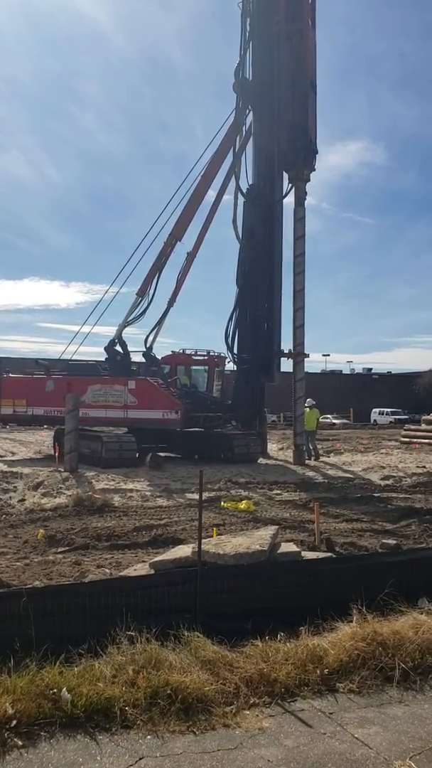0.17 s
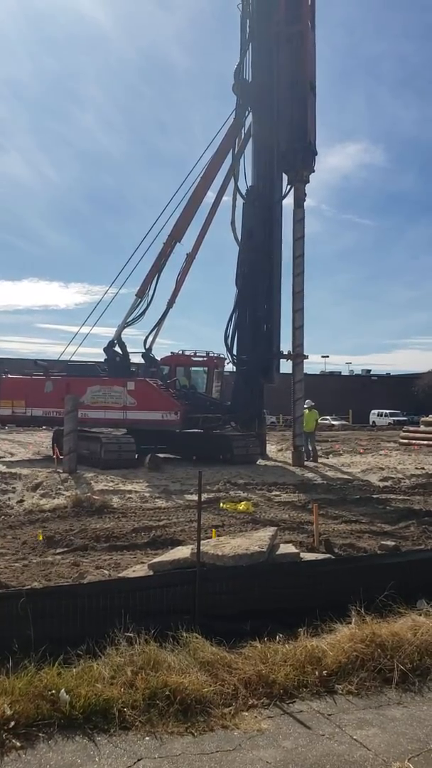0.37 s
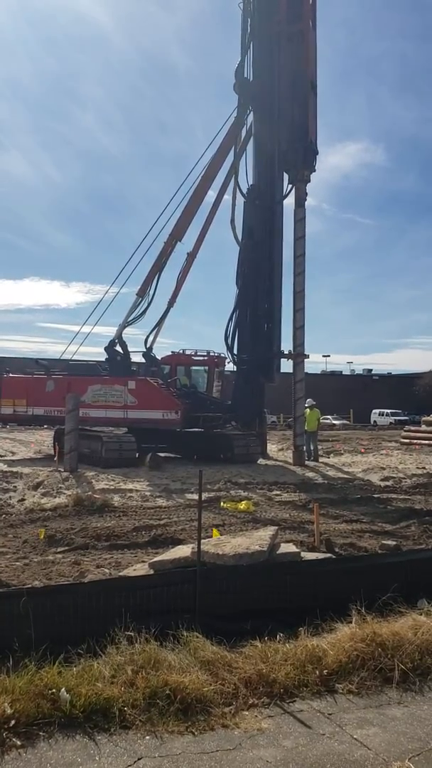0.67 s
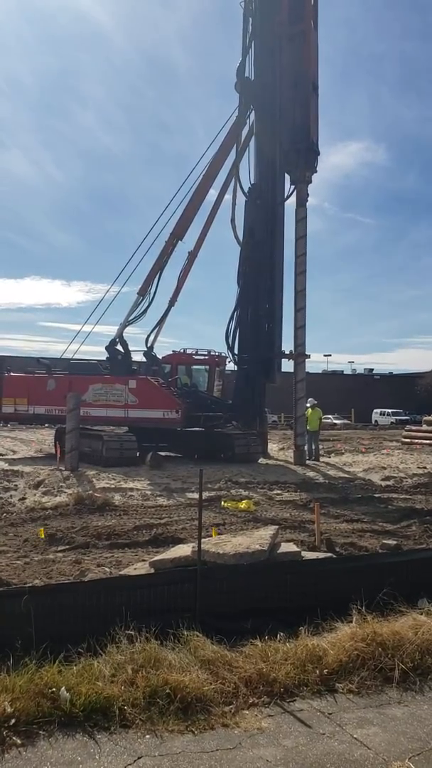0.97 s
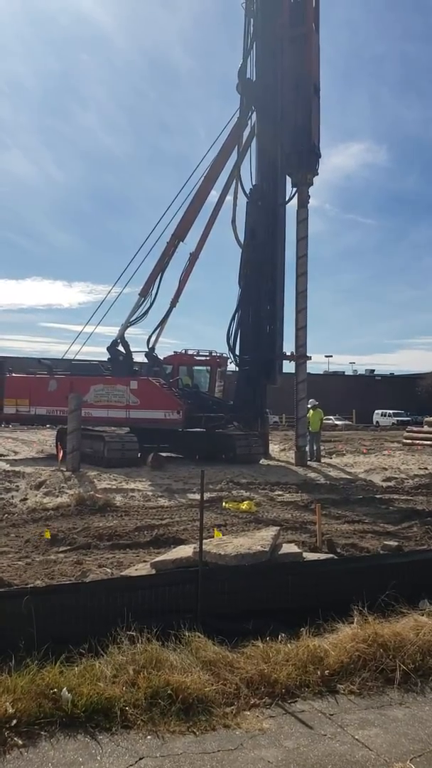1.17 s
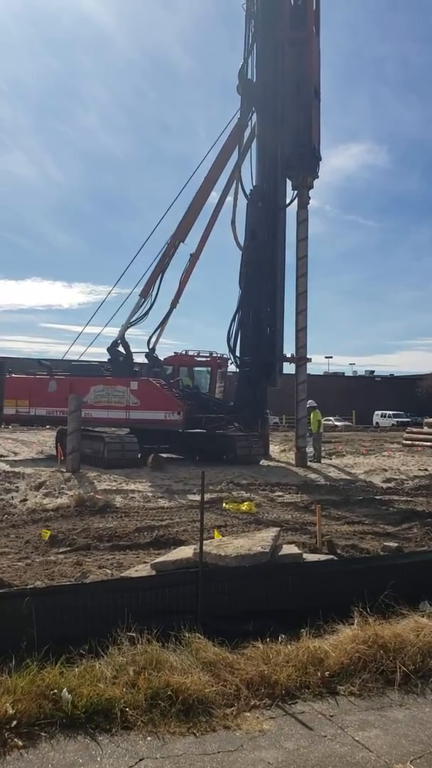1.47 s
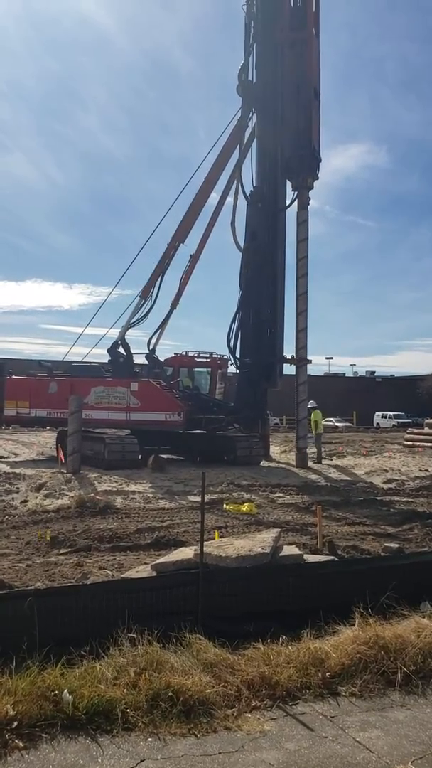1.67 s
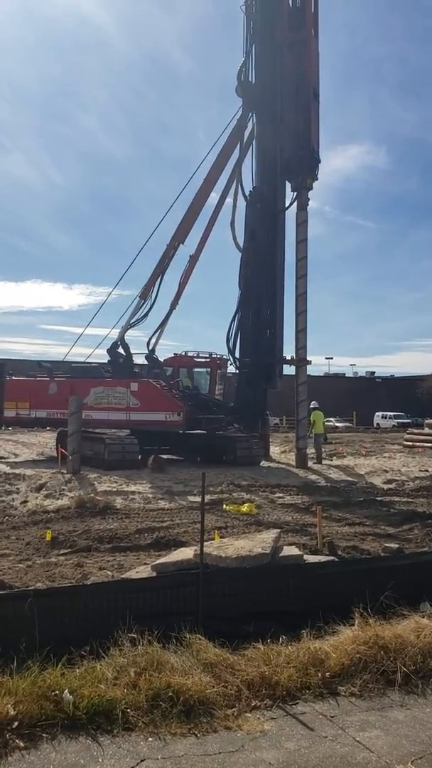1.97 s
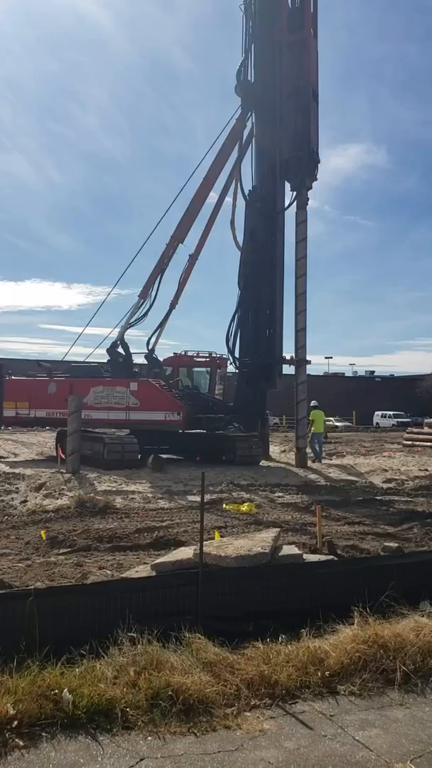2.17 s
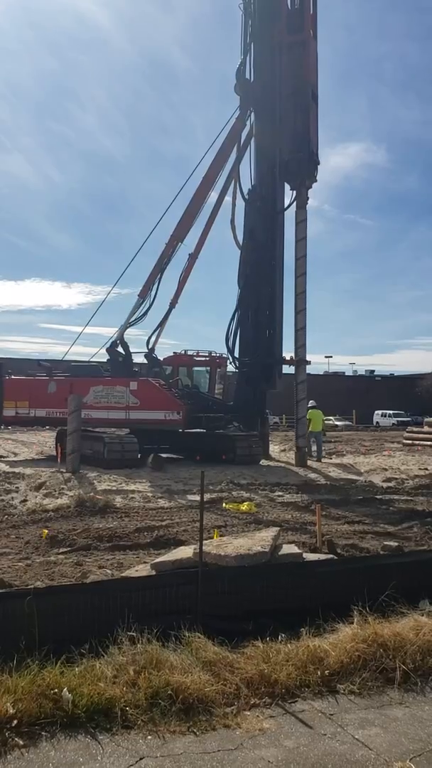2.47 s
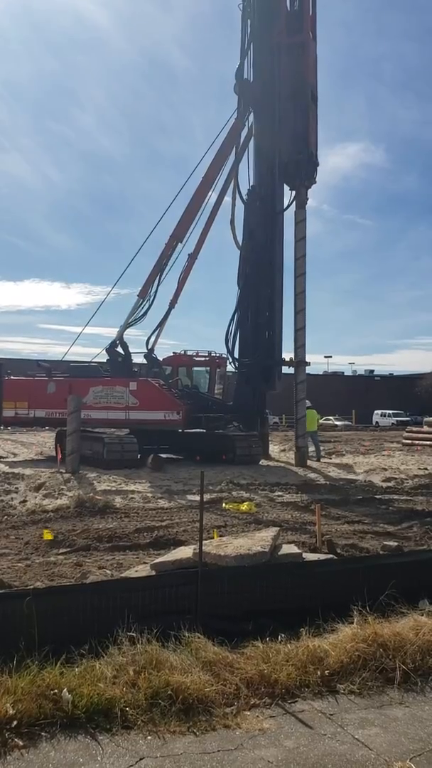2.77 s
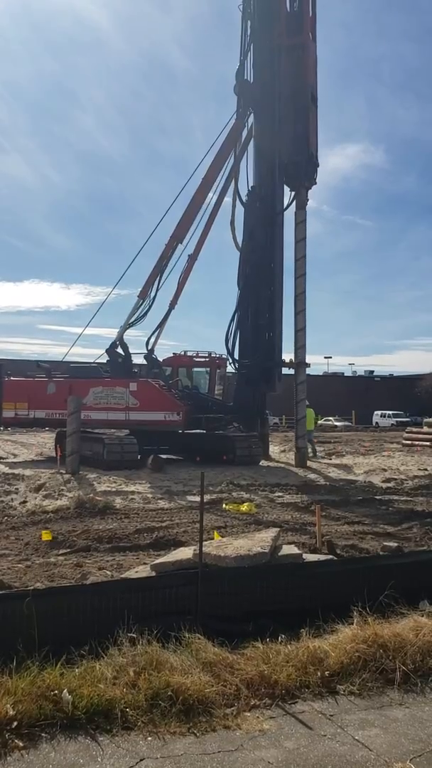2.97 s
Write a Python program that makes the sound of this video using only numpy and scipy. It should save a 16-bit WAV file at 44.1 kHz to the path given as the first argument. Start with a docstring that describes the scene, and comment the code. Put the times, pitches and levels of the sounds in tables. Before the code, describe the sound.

A drilling rig's diesel drones continuously, a deep hum near 107 hertz that sags slightly by 0.7 seconds and settles, over lumpy ground rumble, exhaust and soft fan clatter. Faint hiss fades early; short steel groans sound around 0.5-0.8. A small knock with rebound comes at 1.5. Auger scraping builds to a thin squeal and chirps near 2.3, with another small chirp at 3.05. Open outdoor site, distant stereo pickup.

```python
"""A six-cylinder diesel drones across an open building site, sags as it takes up load and settles.
It drives a drilling rig: firing-rate tones make the drone, and bands of flickering noise make the ground
rumble, exhaust rumble, hiss and fan-and-block clatter, the clatter pulsing with the firings. The turning auger
scrapes and squeals as tiny slips ring its steel, with short groans and chirps. Steel knocks once, with a
rebound. The stereo width and left-right balance of the broad sounds change with pitch."""
import sys
import numpy as np
from scipy import signal
from scipy.io import wavfile

SR = 44100
rng = np.random.default_rng(int(sys.argv[2]) if len(sys.argv) > 2 else 0)


def persist_wave(psi):
    """Save psi, clipped to +-1, as 16-bit WAV."""
    counts = np.round(np.clip(psi, -1, 1) * 32767).astype(np.int16)
    wavfile.write(sys.argv[1], SR, np.atleast_2d(counts).T)


N = 138033
T = np.arange(N) / SR
CYLINDERS = 6
CUTOFF_HZ = 15700
# left-right balance of the site's sounds by pitch: pitch_hz, left_over_right_db
SITE_BALANCE = [(25, -1), (100, 3.5), (320, -0.5), (440, 0.5), (560, 0.5), (720, 5), (950, 0.5),
                (1300, -4.5), (1700, 4.5), (2050, -3), (2900, 11.5), (3500, -4.5), (4200, -3.5), (5400, 6),
                (7000, -5), (8700, 8), (12500, -7)]


def from_db(db):
    """Decibels to gain."""
    return 10 ** (np.asarray(db) / 20)


def rms_one(x):
    """Scale to unit power."""
    return x / np.sqrt(np.mean(x ** 2) + 1e-20)


def in_time(rows):
    """A control curve at every sample, straight between its points."""
    return np.interp(T, *np.transpose(rows))


def at_hz(points, hz):
    """Read a spectrum on a log-frequency axis."""
    point_hz, values = np.transpose(points)
    return np.interp(np.log(hz), np.log(point_hz), values)


def pan(left_over_right_db):
    """Left and right gains of constant power."""
    side_db = np.array([[left_over_right_db], [-left_over_right_db]]) / 2
    return rms_one(from_db(side_db))


def drift(rate_hz):
    """Random wander with spread 1: noise through two equal low-pass poles, computed every 40 samples."""
    step = 40
    pole = np.exp(-2 * np.pi * rate_hz * step / SR)
    noise = rng.standard_normal(N // step + 2002)
    slow = signal.lfilter([1], [1, -2 * pole, pole * pole], noise)[2000:]  # drop the filter's start
    return np.interp(np.arange(N) / step, np.arange(len(slow)), rms_one(slow))


def resonate(x, hz, width_hz):
    """A two-pole resonance with gain 1 at its top."""
    pole = np.exp(-np.pi * width_hz / SR)
    feed = np.array([1, 0, -1]) * (1 - pole * pole) / 2
    feedback = [1, -2 * pole * np.cos(2 * np.pi * hz / SR), pole * pole]
    return signal.lfilter(feed, feedback, x + 1e-18)


def spread(pair, hz):
    """Two unrelated signals become left and right, as alike as the site leaves them at this pitch."""
    # likeness of left and right, held within -0.99 to 0.995 below: pitch_hz, correlation
    likeness = [(25, 1), (60, -0.15), (300, 1.06), (550, 0.74), (1200, 0.66), (2500, 0.51), (5000, 0.18),
                (8000, .1), (13000, -0.24)]
    alike = np.clip(at_hz(likeness, hz), -.99, .995)
    middle = np.sqrt(1 + alike) * pair[0]
    side = np.sqrt(1 - alike) * pair[1] * np.array([[1], [-1]])
    return (middle + side) / np.sqrt(2)


def banded_noise(spectrum, flicker_db, flicker_rate_hz):
    """Quarter-octave bands of stereo noise, each flickering on its own; unit power."""
    low_hz, high_hz = spectrum[0][0], spectrum[-1][0]
    edges = np.geomspace(20, CUTOFF_HZ, 39)
    white = rng.standard_normal((2, 2, N))  # neighbouring bands take turns with two noises
    out = 0
    for k, band_hz in enumerate(zip(edges, edges[1:])):
        hz = np.sqrt(band_hz[0] * band_hz[1])
        if not low_hz <= hz <= high_hz:
            continue
        band_filter = signal.butter(2, band_hz, "band", fs=SR, output="sos")
        pair = signal.sosfilt(band_filter, white[k % 2])
        gain = from_db(at_hz(spectrum, hz) + flicker_db * drift(flicker_rate_hz))
        out = out + gain * pan(at_hz(SITE_BALANCE, hz)) * spread(pair, hz)
    return rms_one(out)


def throb(cycles, depth):
    """A swell at each firing, every cylinder with a random strength of its own; unit power."""
    firings = cycles * CYLINDERS
    cylinder_gain = from_db(4.5 * rng.standard_normal(CYLINDERS))  # spread in dB
    strength = cylinder_gain[firings.astype(int) % CYLINDERS]
    pulse = rms_one(strength * np.sin(np.pi * firings) ** 4)
    return rms_one(1 - depth + depth * pulse)


def ground_rumble():
    """Deep, lumpy rumble of the drilling: low noise bands that flicker strongly."""
    # relative spectrum: pitch_hz, density_db_per_hz
    spectrum = [(25, -27.5), (36, -12.5), (55, 1.5), (75, 2.5), (98, -6.5)]
    # level: time_s, level_db
    level = [(0, -32.5), (.35, -38), (.7, -28.5), (1.0, -32.5), (1.5, -33), (2.05, -33), (2.5, -37),
             (2.65, -28.5), (2.8, -34), (3.13, -29)]
    return from_db(in_time(level)) * banded_noise(spectrum, flicker_db=3.0, flicker_rate_hz=39)


def exhaust_rumble():
    """Rumble of exhaust and site: low noise bands that hold almost steady."""
    # relative spectrum: pitch_hz, density_db_per_hz
    spectrum = [(70, -14.5), (110, 2.5), (150, -0.5), (200, -2.5), (280, -7), (370, -8.5), (450, -12),
                (560, -28)]
    # level: time_s, level_db
    level = [(0, -36), (.8, -36), (1.3, -34.5), (2.1, -35), (2.7, -31.5), (3.13, -31.5)]
    return from_db(in_time(level)) * banded_noise(spectrum, flicker_db=0.3, flicker_rate_hz=9.9)


def hydraulic_hiss():
    """Flickering high noise fades early on; a thin sizzle on top of it dies away."""
    # relative spectra of hiss and sizzle: pitch_hz, density_db_per_hz
    hiss_spectrum = [(3000, -13.5), (4300, 5), (5500, -2), (6700, 5), (7500, -2), (8500, -24)]
    sizzle_spectrum = [(8500, -9), (9500, -4), (10600, -7), (12200, 1.5), (14400, -8.5), (15700, -8)]
    # levels of hiss and sizzle: time_s, level_db
    hiss_level = [(0, -55), (.27, -56.5), (.42, -61.5), (.82, -58), (1.0, -61.5), (1.4, -72), (2.1, -65),
                  (2.6, -64), (3.13, -59)]
    sizzle_level = [(0, -69), (.5, -71), (.85, -61.5), (1.05, -74.5), (1.4, -87)]
    hiss = banded_noise(hiss_spectrum, flicker_db=3.0, flicker_rate_hz=13)
    sizzle = banded_noise(sizzle_spectrum, flicker_db=1.5, flicker_rate_hz=8)
    return from_db(in_time(hiss_level)) * hiss + from_db(in_time(sizzle_level)) * sizzle


def knocks():
    """Each knock is a short crack, ringing modes and a rough rattle of loose parts; a softer contact is duller."""
    # knock and rebound: start_s, gain_db, contact_top_hz, rattle_db, pitch_ratio, ring_length_ratio
    contacts = [(1.5172, -30, 5200, -12, 1, 1), (1.562, -37, 2000, -13, .92, 2.6)]
    # steel modes, before the two ratios of each contact: pitch_hz, relative_db, t60_s
    modes = [(600, -2, .09), (945, 4.5, .055), (1150, -7, .05), (1950, -13, .08), (2490, -16, .08),
             (3480, -5, .025), (4750, -9, .025)]
    out = 0
    for start_s, gain_db, top_hz, rattle_db, pitch_ratio, ring_ratio in contacts:
        age = np.maximum(T - start_s, 0)
        hit = 0
        # crack, then rattle: band in Hz, relative dB, decay to 1/e in s
        noises = [((450, 3600), -2, .0022), ((1650, 2600), rattle_db, .06)]
        for band_hz, part_db, decay_s in noises:
            band_filter = signal.butter(3, band_hz, "band", fs=SR, output="sos")
            noise = rms_one(signal.sosfilt(band_filter, rng.standard_normal((2, N))))
            hit = hit + from_db(part_db) * np.exp(-age / decay_s) * spread(noise, band_hz[0])
        for k, (hz, mode_db, t60_s) in enumerate(modes):
            side_gain = from_db(mode_db + rng.standard_normal((2, 1)))  # each side differs a little
            decay = np.exp(-np.log(1000) * age / (t60_s * ring_ratio))
            tone = np.sin(2 * np.pi * hz * pitch_ratio * age)
            hit = hit + (-1) ** k * side_gain * decay * tone
        softness = signal.butter(3, top_hz, fs=SR, output="sos")
        out = out + from_db(gain_db) * signal.sosfilt(softness, (T >= start_s) * hit)
    return out


def chirps():
    """Where the auger jerks free with a chirp, rasp or tick, one resonance of the steel flares up for a moment."""
    # width is for each of two passes: middle_s, half_length_s, pitch_hz, width_hz, level_db, left_over_right_db
    jerks = [(2.289, .0015, 8000, 4500, -50.5, 0), (2.314, .004, 5500, 700, -46, 2),
             (2.295, .05, 5200, 2800, -52, 2), (2.35, .024, 4250, 800, -47, -4),
             (3.047, .004, 3450, 400, -43, -3), (3.043, .0013, 10000, 6000, -50, 0)]
    out = 0
    for middle_s, half_s, hz, width_hz, level_db, side_db in jerks:
        noise = rng.standard_normal((2, N))
        ring = rms_one(resonate(resonate(noise, hz, width_hz), hz, width_hz))
        flare = np.exp(-((T - middle_s) / half_s) ** 2)
        out = out + from_db(level_db) * flare * pan(side_db) * spread(ring, hz)
    return out


def groans():
    """Rubbing steel briefly sings one unsteady tone, which glides and sags where it is pressed hardest."""
    # pitch is before sag: middle_s, half_length_s, pitch_hz, level_db, waver_share, glide_hz_per_s
    rubs = [(.462, .018, 795, -44, .006, -2400), (.555, .04, 652, -40, .006, 100),
            (.722, .019, 660, -42.5, .006, -700), (.819, .22, 2080, -50.5, .04, 0)]
    sag_share, waver_rate_hz = .06, 130
    out = 0
    for middle_s, half_s, hz, level_db, waver, glide in rubs:
        swell = np.exp(-((T - middle_s) / half_s) ** 2)
        unsteady = 1 + waver * drift(waver_rate_hz) - sag_share * swell
        pitch_hz = hz * unsteady + glide * (T - middle_s)
        tone = np.sqrt(2) * np.sin(2 * np.pi * np.cumsum(pitch_hz) / SR)
        out = out + from_db(level_db) * swell * tone * pan(at_hz(SITE_BALANCE, hz))
    return out


def squeak():
    """Under the grainy squeal the steel holds one thin tone, fluttering in level and wavering in pitch."""
    # steady core of the squeal, before flutter: time_s, level_db
    level = [(1.6, -76), (1.85, -63), (2.05, -62), (2.17, -55), (2.34, -51.5), (2.41, -70)]
    pitch_hz = 3410 + 45 * drift(rate_hz=90)
    level_db = in_time(level) + 4 * drift(rate_hz=55)
    tone = np.sqrt(2) * np.sin(2 * np.pi * np.cumsum(pitch_hz) / SR)
    return from_db(level_db) * tone * pan(-2.5)


def scrape(cycles):
    """Dense tiny slips, shaken by the engine, ring the steel broadly and build into a narrow squeal."""
    # broad resonances of the steel: pitch_hz, width_hz, relative_db, left_over_right_db
    steel = [(3536, 280, 0, -10), (4165, 230, 3.5, -9.5), (4540, 560, -2, -6.5), (5100, 1200, -9.5, 9),
             (7400, 570, -10.5, 4.5), (10500, 2200, -21.5, 2)]
    # squeal tones, width for each of two passes: pitch_hz, width_hz, relative_db, left_over_right_db
    squeal_tones = [(3400, 200, 0, -4.5), (7670, 250, -17.5, 0.5)]
    # levels of scrape and squeal, which rises as the rubbing tightens: time_s, level_db
    scrape_level = [(0, -52), (.3, -58), (.55, -51.5), (.85, -54.5), (1.3, -62), (1.75, -60), (2.05, -61),
                    (2.2, -52), (2.33, -48), (2.42, -57), (2.7, -58), (3.04, -52), (3.13, -57)]
    squeal_level = [(0, -65.5), (.7, -56.5), (1.4, -66), (1.9, -68), (2.05, -62.5), (2.18, -53),
                    (2.35, -45.5), (2.42, -65.5), (2.75, -65), (3.05, -53.5), (3.13, -59)]
    slips_per_s, size_spread_db, throb_depth = 1800, 0.5, 0.2
    stick_db, stick_rate_hz = 1.4, 59

    sizes = from_db(size_spread_db * np.minimum(rng.exponential(1, (2, N)), 4))
    signs = rng.choice([-1, 1], (2, N))
    happens = rng.random((2, N)) < slips_per_s / SR
    sticking = from_db(stick_db * drift(stick_rate_hz))
    slips = sizes * signs * happens * throb(cycles, throb_depth) * sticking

    rings = 0
    for k, (hz, width_hz, db, side_db) in enumerate(steel):
        ring = spread(resonate(slips, hz, width_hz), hz)
        rings = rings + (-1) ** k * from_db(db) * pan(side_db) * ring  # signs alternate
    squeal = 0
    for hz, width_hz, db, side_db in squeal_tones:
        narrow = resonate(resonate(slips, hz, width_hz), hz, width_hz)
        squeal = squeal + from_db(db) * pan(side_db) * spread(narrow, hz)
    squeal = rms_one(squeal * throb(cycles, throb_depth))
    return from_db(in_time(scrape_level)) * rms_one(rings) + from_db(in_time(squeal_level)) * squeal


def clatter(cycles):
    """Clatter of the block with the cooling fan: broad noise that pulses slightly with the firings."""
    # relative spectrum: pitch_hz, density_db_per_hz
    spectrum = [(400, -8), (530, -9.5), (690, 1), (1000, -4), (1280, -3), (1750, -11.5), (2100, -10),
                (2700, -21), (3100, -17.5), (4200, -18.5), (5500, -30), (7400, -28), (8700, -35),
                (12000, -37), (15500, -47)]
    # level: time_s, level_db
    level = [(0, -41), (1.2, -39.5), (1.9, -40), (2.6, -39), (3.13, -38)]
    noise = banded_noise(spectrum, flicker_db=0.64, flicker_rate_hz=4.9)
    return from_db(in_time(level)) * noise * throb(cycles, depth=0.08)


def drone(cycles):
    """The exhaust note at the firing rate, with the wavering overtones of uneven cylinders, gears and a driven
    pump."""
    # engine load, as the level of the exhaust note before waver: time_s, level_db
    load = [(0, -19), (.3, -20.5), (.42, -17.5), (.56, -19), (.74, -16), (1.1, -16), (1.4, -17), (1.9, -17),
            (2.3, -16.5), (2.42, -15.5), (2.72, -15), (2.86, -17.5), (3.0, -14.5), (3.13, -18)]
    # overtones of exhaust, gears and a driven pump (the 39.25 row), before swell: multiple_of_two_turn_cycle,
    # level_db, left_over_right_db
    overtones = [(13.1, -44, 0), (16, -41, 0), (18, -36.5, 0), (19, -55, 0), (20, -58, 0), (21, -58, -1),
                 (22, -53, -2), (26.05, -56, -3), (36, -61, 4), (38, -63, 4), (39.25, -58, 5), (42, -61, 4),
                 (112, -62.5, -4), (126, -63.5, 0)]
    load_db = in_time(load)
    note_gain = from_db(load_db + 0.5 * drift(rate_hz=38))
    out = note_gain * np.sin(2 * np.pi * CYLINDERS * cycles) * pan(.3)
    swell_db = 0.5 + 0.27 * (load_db - load_db.mean())  # overtones follow the load only in part
    for multiple, db, side_db in overtones:
        tone = np.sin(2 * np.pi * (multiple * cycles + rng.random()))
        gain = from_db(db + swell_db + 0.63 * drift(rate_hz=3.7))
        out = out + gain * tone * pan(side_db)
    return np.sqrt(2) * out  # sine peak to RMS level


def scene():
    """The engine's turning drives drone, clatter and scrape among the noises of site and auger."""
    # engine speed: time_s, firings_per_s
    speed = [(0, 108.8), (.1, 108.6), (.24, 107.6), (.54, 107.6), (.73, 106.05), (1.04, 105.95),
             (1.22, 106.7), (2.1, 106.85), (2.55, 106.6), (3.13, 106.8)]
    cycles = np.cumsum(in_time(speed)) / SR / CYLINDERS  # two-turn engine cycles so far
    site = ground_rumble() + exhaust_rumble() + hydraulic_hiss() + knocks()
    auger = chirps() + groans() + squeak() + scrape(cycles)
    engine = clatter(cycles) + drone(cycles)
    return site + auger + engine


def record(dry):
    """A steep elliptic low-pass cuts the top."""
    return signal.sosfilt(signal.ellip(10, .1, 80, CUTOFF_HZ, fs=SR, output="sos"), dry)


dry = scene()
out = record(dry)
persist_wave(out)
```